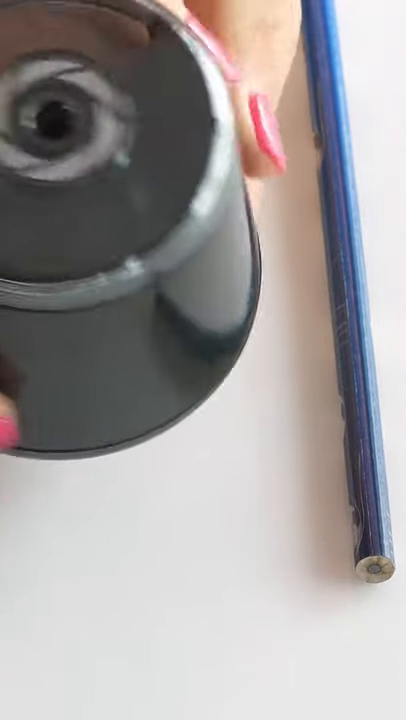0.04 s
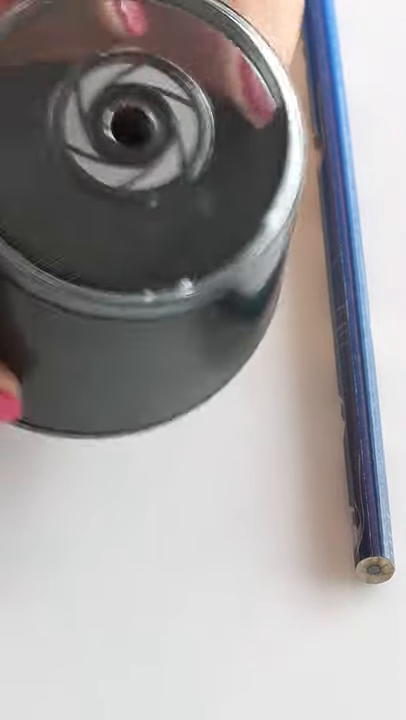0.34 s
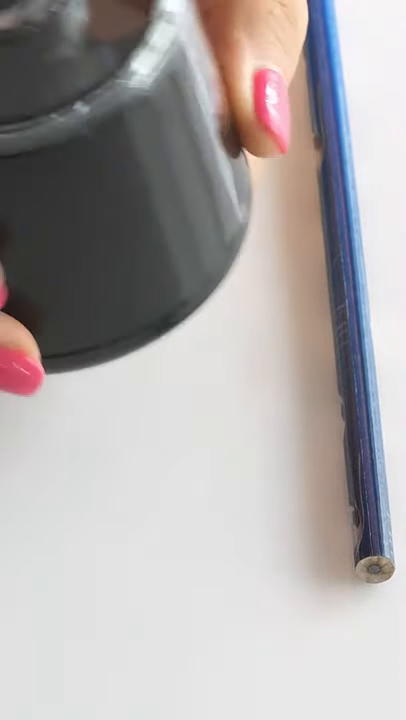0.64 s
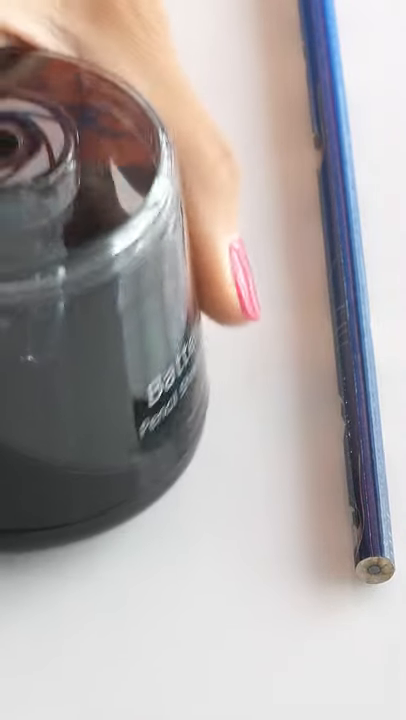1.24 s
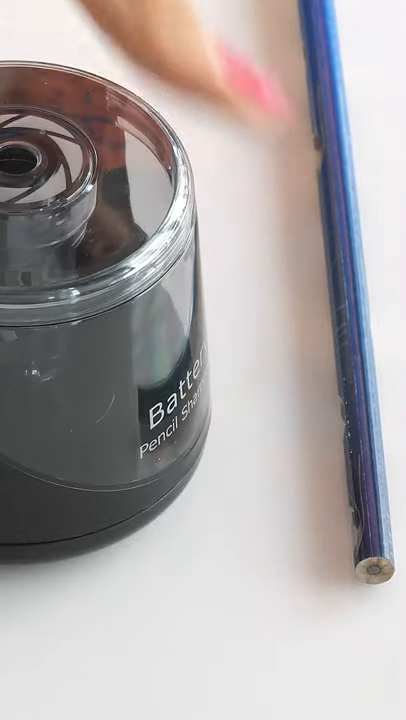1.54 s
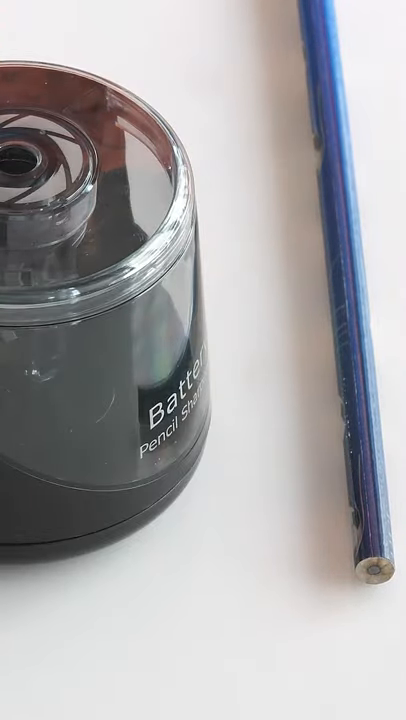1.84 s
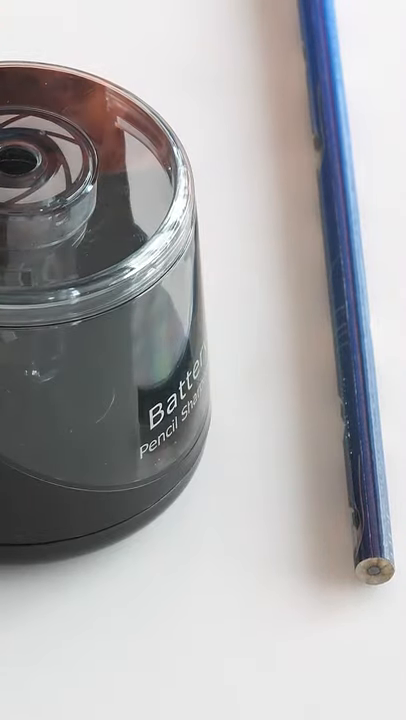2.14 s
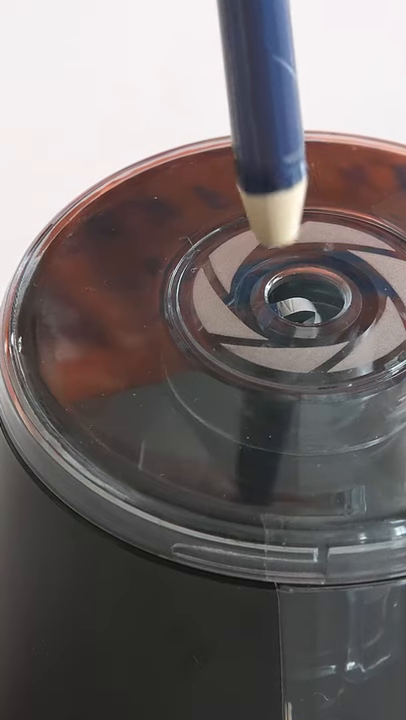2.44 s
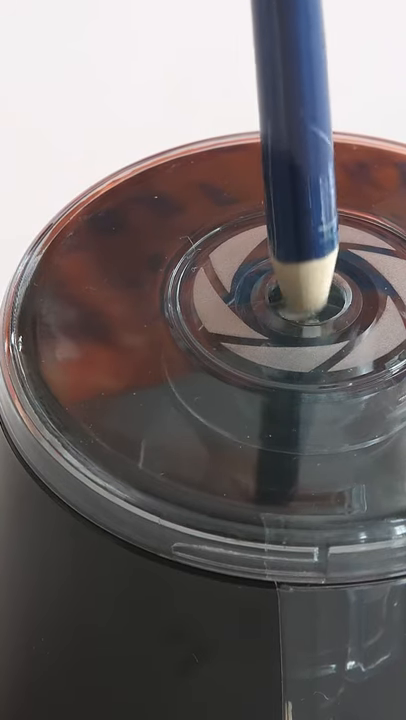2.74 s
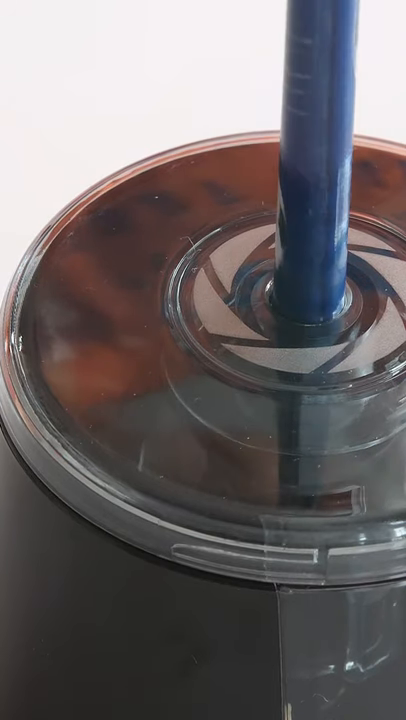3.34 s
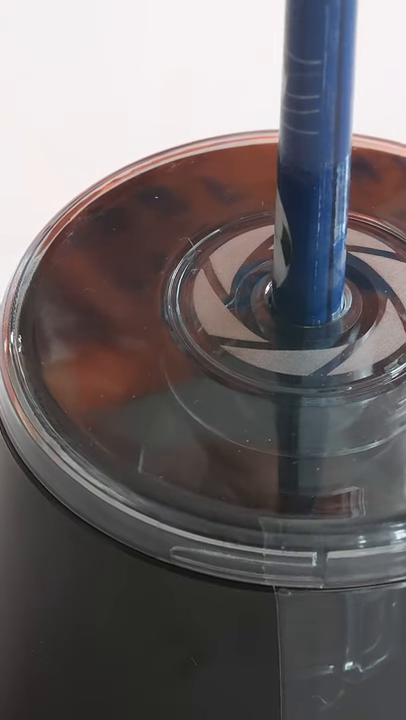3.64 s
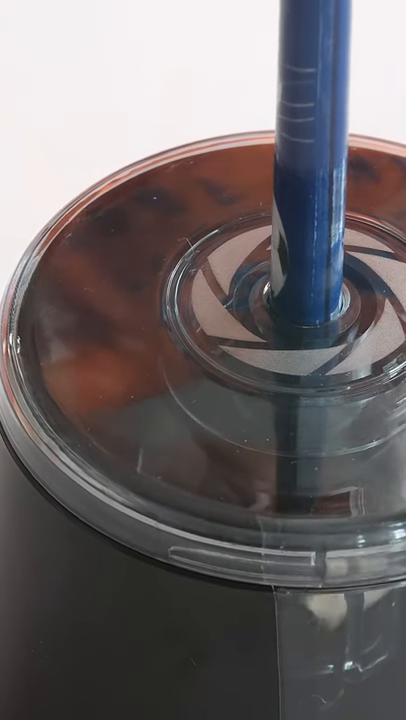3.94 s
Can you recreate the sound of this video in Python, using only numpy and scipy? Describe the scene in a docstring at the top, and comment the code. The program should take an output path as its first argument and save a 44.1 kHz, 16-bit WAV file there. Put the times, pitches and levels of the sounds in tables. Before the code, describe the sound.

Electric pencil sharpener is handled and set down, then starts whining and grinding a pencil.

```python
"""A quiet room, close to a table: a battery pencil sharpener is turned over in the hands and set down.
A pencil slides into the hole and trips the switch; the small motor spins up and sags under the load.
Its off-centre pinion whines in the plastic housing while the gears rattle and the blade rasps the wood."""
import sys
import numpy as np
from scipy import signal
from scipy.fft import rfft, irfft
from scipy.io import wavfile

SR = 44100
rng = np.random.default_rng(int(sys.argv[2]) if len(sys.argv) > 2 else 0)


def generate_wav(sig):
    """Save sig (samples, or channels by samples) to the path in sys.argv[1] as 16-bit PCM at SR."""
    pcm = np.round(np.clip(np.atleast_2d(sig).T, -1, 1) * 32767).astype(np.int16)
    wavfile.write(sys.argv[1], SR, pcm)


N = 176400
T = np.arange(N) / SR
MOTOR_START_S, TEETH = 3.327, 10
RUNNING = T > MOTOR_START_S

# gear levels: t/s, whine/dB, rattle/dB
GEAR_LEVELS = [(3.33, -46, -43), (3.365, -27, -28), (3.39, -35, -25.5), (3.415, -31, -25),
               (3.44, -23.5, -22), (3.5, -21, -22.5), (3.57, -19, -23.5), (3.645, -21.5, -24),
               (3.7, -17, -22.5), (3.76, -19, -24), (3.84, -19, -23.5), (3.92, -20, -24), (4.0, -22, -24)]


def amp(db):
    """dB to gain."""
    return 10 ** (np.asarray(db) / 20)


def unit(x):
    """Scale to rms 1."""
    return x / np.sqrt(np.mean(x ** 2) + 1e-20)


def curve(rows, column=1):
    """Table column, linear in time."""
    rows = np.array(rows)
    return np.interp(T, rows[:, 0], rows[:, column])


def level_at(spectrum, hz):
    """Spectrum level in dB, interpolated over log f."""
    f, db = np.transpose(spectrum)
    return np.interp(np.log(hz + 1), np.log(f), db)


def colour(x, spectrum, size=8192):
    """Minimum-phase filter of unit energy."""
    log_gain = np.log(amp(level_at(spectrum, abs(np.fft.fftfreq(size, 1 / SR)))))
    taps = np.fft.ifft(np.exp(np.conj(signal.hilbert(log_gain)))).real[:size // 2]
    return signal.fftconvolve(x, taps / np.linalg.norm(taps))[:len(x)]


def wander(max_hz):
    """Low-passed random motion, rms 1."""
    band = np.fft.rfftfreq(N, 1 / SR) < max_hz
    return unit(irfft(rfft(rng.standard_normal(N)) * band, N))


def scatter(spread_db):
    """Gains of random size and sign."""
    return amp(spread_db * rng.standard_normal(N)) * rng.choice([-1, 1], N)


def add(mix, start_s, sound):
    """Mix in at start_s."""
    part = mix[round(start_s * SR):][:len(sound)]
    part += sound[:len(part)]


def bursts(rows):
    """Decaying noise puffs from rows of t/s, level/dB, decay/s."""
    out, t = np.zeros(N), T[:SR // 4]
    for s, db, decay_s in rows:
        add(out, s, amp(db) * np.exp(-t / decay_s) * rng.choice([-1, 1], len(t)))
    return out


def ring(modes):
    """Impulse response of damped modes."""
    t = T[:SR // 2]
    return sum(amp(db - 60 * t / t60_s) * np.sin(2 * np.pi * hz * t) for hz, db, t60_s in modes)


def room(air_db=-55.5, whistle_hz=2790, whistle_db=-72):
    """Steady room noise with a faint, thin whistle."""
    # room noise: f/Hz, level/dB
    air_spectrum = [(15, -65), (25, -11.5), (64, -9), (101, -2), (119, -7.5), (233, -3), (267, -11.5),
                    (421, -15.5), (457, -13.5), (648, -15), (2060, -23), (2770, -22.5), (3000, -21),
                    (5730, -22), (15500, -28)]
    air = unit(colour(rng.standard_normal(N), air_spectrum))
    whistle = np.sin(2 * np.pi * np.cumsum(whistle_hz + 8 * wander(33)) / SR)
    return amp(air_db) * air + amp(whistle_db) * whistle


def rubbing(levels, spectrum, uneven_db=2):
    """Uneven friction noise under a level curve."""
    envelope = amp(curve(levels) + uneven_db * wander(70))
    return colour(rng.standard_normal(N) * envelope, spectrum)


def handling(bump_decay_s=0.014):
    """Fingers rub the case; nails and the loose lid click, each with a soft bump."""
    # plastic clicks: t/s, click/dB, decay/s, bump/dB
    taps = [(0.064, -42, 0.002, -66), (0.097, -40, 0.0027, -52), (0.227, -69, .003, -63),
            (0.305, -54, 0.0025, -55), (0.388, -52.5, 0.008, -67), (.398, -47, 0.0034, -68),
            (0.515, -53, 0.0054, -42.5), (.578, -53, 0.0043, -52), (.615, -52, 0.0054, -49),
            (0.7154, -29.5, 0.0021, -45.5), (.734, -52, .006, -66), (0.896, -50.5, 0.0076, -56),
            (0.954, -48, 0.0046, -75), (0.985, -30, 0.0012, -49.5), (1.214, -49, .0025, -57),
            (1.242, -45, 0.0025, -30.5), (1.26, -51, 0.0016, -60), (1.315, -45.5, 0.0016, -60),
            (1.402, -47.5, 0.0024, -53)]
    # click on the case: f/Hz, level/dB
    click_spectrum = [(300, -16), (1100, -8), (1500, -19), (2050, 0), (2600, 1), (3100, -12), (4400, 0),
                      (5200, 2), (6200, -6), (7200, -2), (10000, -11), (15500, -22)]
    # low bump: f/Hz, level/dB
    bump_spectrum = [(25, -12), (70, 1.5), (140, -5.5), (240, -15.5), (400, -26), (1000, -40), (4000, -78)]
    # shifting fingers: t/s, level/dB
    grip_levels = [(0, -60.5), (.12, -56), (.2, -64.5), (.4, -61.5), (.7, -63), (.8, -63.5), (.93, -60.5),
                   (1.15, -66.5), (1.5, -58), (1.7, -91)]
    # skin on plastic: f/Hz, level/dB
    skin_spectrum = [(30, 2), (130, 3), (280, 3.5), (450, -6.5), (1100, -3), (1500, -13), (2100, -14),
                     (2600, -4.5), (3200, -19), (4500, -18.5), (7200, -12), (15500, -24)]
    clicks = colour(bursts((s, db, decay_s) for s, db, decay_s, _ in taps), click_spectrum)
    bumps = colour(bursts((s, db, bump_decay_s) for s, _, _, db in taps), bump_spectrum)
    return clicks + bumps + rubbing(grip_levels, skin_spectrum)


def set_down(spot_spread_db=2, case_rise_s=.0015, low_cut_hz=45, clatter_db=-6, clatter_decay_s=.004):
    """Each contact pushes the table top and rings the case from a different spot."""
    # base rocking on the table: t/s, thud/dB, contact/s, case ring/dB
    knocks = [(0.492, -41, 0.004, -73), (.517, -59, .005, -55), (1.231, -42.5, 0.00048, -50),
              (1.241, -36.5, .003, -48), (1.258, -32, 0.0029, -33.5), (1.277, -20, 0.0121, -70),
              (1.376, -33.5, 0.0012, -52), (1.383, -31.5, 0.0026, -36.5), (1.393, -27, 0.0042, -40),
              (1.401, -26, 0.00304, -43), (1.435, -34, 0.0011, -59), (1.457, -31, 0.0019, -37.5),
              (1.477, -63, 0.01, -75), (1.522, -34.5, 0.0067, -56)]
    # table top: f/Hz, level/dB, t60/s
    table_modes = [(74.7, -5.5, 0.37), (101, -16, 0.38), (139.3, -1.5, 0.27), (169, -7.5, 0.19),
                   (241.7, -5, 0.2), (333, -6.5, 0.13), (412, -10, 0.11), (470, -3, 0.057),
                   (556, -9, 0.093), (662, -18, 0.17)]
    # plastic case: f/Hz, level/dB, t60/s
    case_modes = [(1110, -14, .07), (1335, -14, .02), (1700, -11, .01), (2005, -3, .04), (2270, -7, .045),
                  (2560, -12, .01), (2930, -13, .02)]
    # dry clatter of the base: f/Hz, level/dB
    clatter_spectrum = [(300, -3), (650, 0), (1300, -2), (1700, 0.5), (2800, -6), (3500, -17), (5200, -15),
                        (12000, -27)]
    ringing, table = np.zeros(N), ring(table_modes)
    for s, thud_db, contact_s, case_db in knocks:
        push = np.sin(np.pi * np.minimum(T[:SR // 20] / contact_s, 1))
        add(ringing, s, -amp(thud_db) * signal.fftconvolve(table, push / push.sum()))
        case = ring((hz, db + spot_spread_db * rng.standard_normal(), t60) for hz, db, t60 in case_modes)
        rise = np.minimum(T[:len(case)] / case_rise_s, 1)
        add(ringing, s, amp(case_db) * case * rise)
    ringing = signal.lfilter(*signal.butter(2, low_cut_hz, "high", fs=SR), ringing)
    clatter = bursts((s, db + clatter_db, clatter_decay_s) for s, _, _, db in knocks)
    return ringing + colour(clatter, clatter_spectrum)


def pencil(clunk_decay_s=.012):
    """The pencil rubs down the guide and snaps the switch shut."""
    # pencil sliding: t/s, level/dB
    slide_levels = [(2.828, -80), (2.835, -55), (2.87, -75), (2.98, -74), (3.015, -54.5), (3.07, -72),
                    (3.16, -64), (3.205, -54.5), (3.25, -60), (3.3, -82)]
    # friction in the guide: f/Hz, level/dB
    guide_spectrum = [(300, -19), (900, -7.5), (1200, 3), (1600, -19), (4000, -25), (12000, -35)]
    # switch pressed home: t/s, snap/dB, decay/s, clunk/dB
    latch = [(3.2598, -22, 0.0017, -34.5), (3.272, -46, 0.016, -31.5), (3.2961, -29.5, 0.00098, -29.5),
             (3.307, -57, 0.0066, -34), (3.3272, -13.5, 0.0012, -23), (3.339, -33, 0.0044, -43),
             (3.348, -22, 0.0026, -22)]
    # switch snap: f/Hz, level/dB
    snap_spectrum = [(200, -27), (1000, -5), (1900, 6), (2800, -7.5), (3900, 1), (5500, -21.5), (8000, -15),
                     (11000, -32), (15500, -49)]
    # low clunk: f/Hz, level/dB
    clunk_spectrum = [(30, -11), (130, -0.5), (230, -4), (340, -2), (480, -8.5), (750, -18), (2000, -24),
                      (8000, -46)]
    snaps = colour(bursts((s, db, decay_s) for s, db, decay_s, _ in latch), snap_spectrum)
    clunks = colour(bursts((s, db, clunk_decay_s) for s, _, _, db in latch), clunk_spectrum)
    return rubbing(slide_levels, guide_spectrum) + snaps + clunks


def whine(turns, backlash_rad=.15, backlash_hz=170):
    """Tooth tone, phase-swung once a turn by the off-centre pinion, loose in its backlash."""
    # tooth-tone partials: multiples of the shaft rate
    orders = [10, 20, 29, 40, 51, 61]
    # one partial per order: level/dB, phase swing/rad
    partials = [(1, 0.32), (4, 1), (-6.5, 1.2), (-4, 1.4), (-4.5, 0.4), (-13, .5)]
    # housing response: f/Hz, gain/dB
    housing = [(1300, 2), (1650, -5.5), (1950, -4), (2200, 5.5), (2530, 6), (2800, 8.5), (3450, 2),
               (3850, 7.5), (4200, -1), (5700, 3), (7700, 2.5), (9800, -6.5), (11700, -25), (15500, 0)]
    shaft_rad = 2 * np.pi * turns
    pinion_rad = shaft_rad + backlash_rad * wander(backlash_hz) / TEETH
    tone = sum(amp(db) * np.cos(order * pinion_rad + swing_rad * np.sin(shaft_rad))
               for order, (db, swing_rad) in zip(orders, partials))
    tone = colour(tone, housing)
    return tone / tone[RUNNING].std() * amp(curve(GEAR_LEVELS, column=1))


def rattle(turns, shaft_hz, slide_gain=0.68, turn_depth=0.26, buzz_db=-7.5):
    """Teeth strike unevenly and slide, harder on one side of each turn; part repeats as a buzz."""
    # gear rattle: f/Hz, level/dB
    rattle_spectrum = [(100, -16), (700, -9.5), (1400, -11.5), (1750, -2), (1970, 6.5), (2180, -10.5),
                       (2450, -1.5), (2850, -9), (3400, 1), (3850, 10), (4250, 1.5), (4750, -4.5),
                       (5700, 0.5), (6600, -6.5), (7700, -1.5), (8400, -4), (9300, -7.5), (9800, -8),
                       (10800, -26), (11700, -14.5), (12300, -28), (15500, -62)]
    # once-per-turn buzz: f/Hz, level/dB
    buzz_spectrum = [(190, 4.5), (385, 12), (575, -5), (900, -1.5), (1700, 4.5), (2500, 5), (3100, 8),
                     (4400, -23), (5500, 5), (7000, -0.5), (9500, 4.5), (11000, -6), (15500, -28)]
    strikes = np.diff(np.floor(turns * TEETH), prepend=0) * scatter(spread_db=1.5)
    slide = rng.standard_normal(N) * (1 + np.cos(2 * np.pi * TEETH * turns) / 2)
    force = strikes / strikes[RUNNING].std() + slide_gain * slide
    force *= 1 + turn_depth * np.cos(2 * np.pi * turns)
    noise = colour(force / force[RUNNING].std(), rattle_spectrum)
    buzz = np.zeros(N)
    for order in range(1, 70):
        gain = amp(level_at(buzz_spectrum, order * shaft_hz[RUNNING]))
        buzz[RUNNING] += gain * np.cos(2 * np.pi * (order * turns[RUNNING] + rng.random()))
    buzz[RUNNING] = unit(buzz[RUNNING])
    return (noise + amp(buzz_db) * buzz) * amp(curve(GEAR_LEVELS, column=2))


def chatter(turns, decay_turns=0.72):
    """Slack teeth slap once a turn, loudest before the blade loads them."""
    # slack gears: t/s, level/dB
    slack_levels = [(3.33, -50), (3.37, -35), (3.42, -32), (3.44, -26), (3.52, -28), (3.58, -35),
                    (4.0, -36)]
    # tooth slap: f/Hz, level/dB
    slap_spectrum = [(1000, -40), (2500, -3), (3100, -13), (4600, -13), (5750, 3.5), (6300, -1),
                     (6900, -2.5), (8300, -10), (9500, -9), (10500, -16), (12000, -23), (15500, -38)]
    slaps = np.exp(-(turns % 1) / decay_turns) * rng.standard_normal(N)
    return colour(slaps / slaps[RUNNING].std(), slap_spectrum) * amp(curve(slack_levels))


def blade(chips_per_s=900, rasp_db=-2.5, ring_db=-3.5):
    """Wood breaks away in small chips; table top and shavings cup ring as the blade cuts."""
    # bite of the blade: t/s, level/dB
    bite_levels = [(3.33, -27.5), (3.37, -38.5), (3.426, -30), (3.608, -29), (3.658, -20), (3.684, -30.5),
                   (3.718, -27), (3.782, -29), (3.884, -26.5), (3.934, -32.5), (3.966, -25), (4.0, -29)]
    # wood rasp: f/Hz, level/dB
    rasp_spectrum = [(25, -17), (70, 0.5), (105, -24), (135, -3.5), (200, -9), (285, -17), (330, 7.5),
                     (365, -8), (410, -7), (470, 5.5), (530, -2), (640, -9), (850, -11.5), (1250, -16.5),
                     (2000, -45), (6000, -37)]
    # table top (two lowest modes) and shavings cup: f/Hz, level/dB, t60/s
    modes = [(70, -10.5, .3), (139.7, -4, 0.29), (327, 1, 0.38), (388, -6, 0.44), (464, -2, 0.22),
             (567.7, 2, 0.28)]
    chips = (rng.random(N) < chips_per_s / SR) * scatter(spread_db=2.5)
    rasp = unit(colour(chips, rasp_spectrum))
    ringing = unit(signal.fftconvolve(chips, ring(modes))[:N])
    return (amp(rasp_db) * rasp + amp(ring_db) * ringing) * amp(curve(bite_levels))


def motor(speed_jitter=.0012):
    """Gears and blade sound while the shaft turns."""
    # shaft spin-up and sag: t/s, f/Hz
    shaft_speed = [(3.328, 55), (3.348, 107), (3.362, 130), (3.386, 165.5), (3.414, 190.5), (3.44, 199.8),
                   (3.505, 201), (3.57, 190.6), (3.61, 192.8), (3.655, 192), (3.69, 196), (3.744, 191.4),
                   (3.836, 191), (3.9, 187.8), (3.96, 182.9), (4.0, 183.5)]
    shaft_hz = curve(shaft_speed) * (1 + speed_jitter * wander(60))
    turns = np.cumsum(shaft_hz * RUNNING) / SR
    return RUNNING * (whine(turns) + rattle(turns, shaft_hz) + chatter(turns) + blade())


def scene(echo_db=-14, echo_t60_s=.18, echo_delay_s=.004):
    """Sharpener, short room echo and room noise; mono."""
    direct = handling() + set_down() + pencil() + motor()
    t = T[:SR // 3]
    tail = rng.standard_normal(len(t)) * amp(-60 * t / echo_t60_s) * (t > echo_delay_s)
    echo = signal.fftconvolve(direct, tail / np.linalg.norm(tail))[:N]
    return (direct + amp(echo_db) * echo + room())[None]


def record(dry):
    """Steep low-pass at 15850 Hz."""
    taps = signal.firwin(511, 15850, window=("kaiser", 9), fs=SR)
    return signal.oaconvolve(dry, taps[None], "same")


dry = scene()
out = record(dry)
generate_wav(out)
```